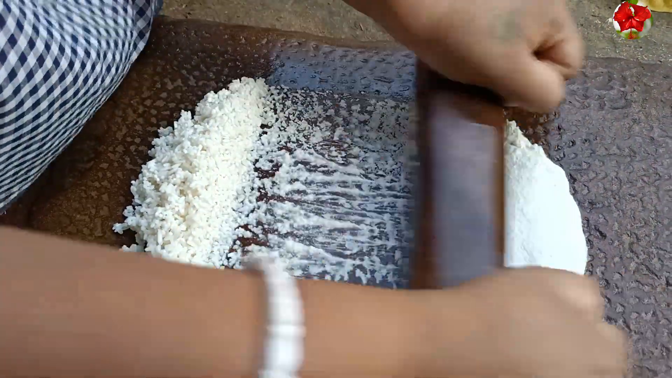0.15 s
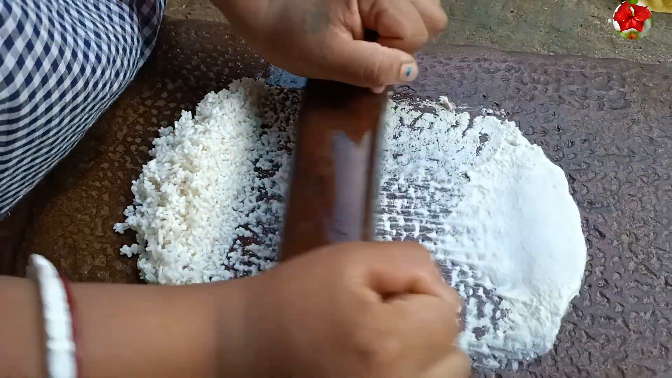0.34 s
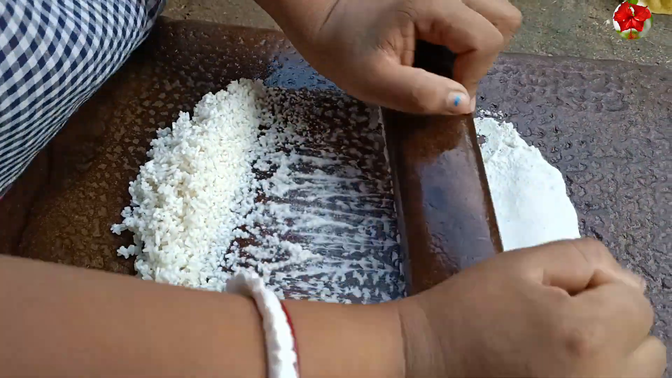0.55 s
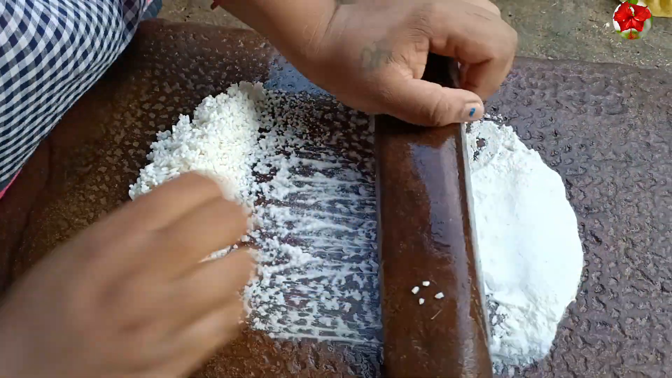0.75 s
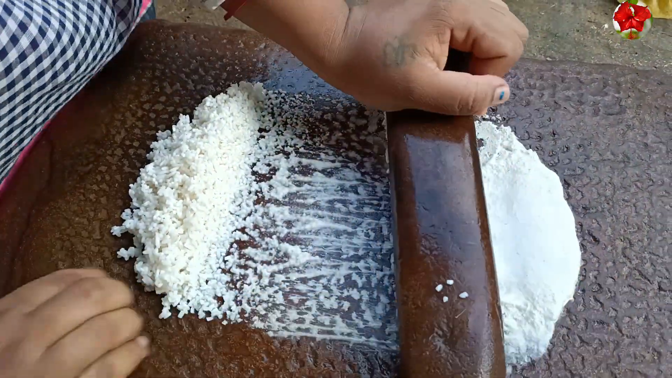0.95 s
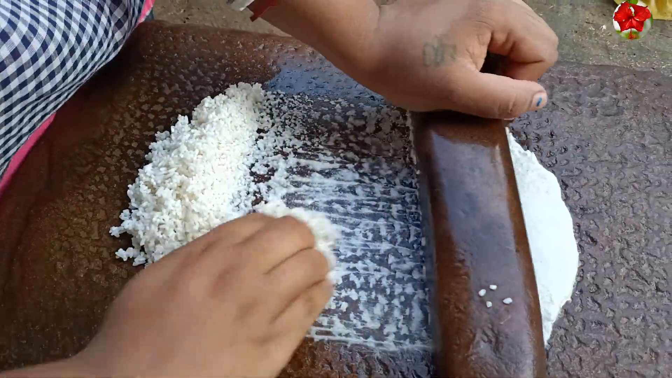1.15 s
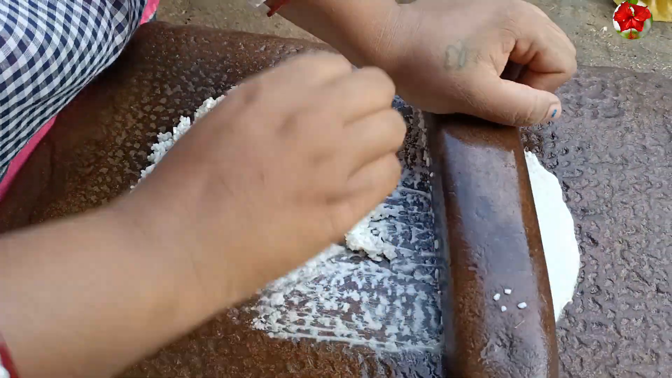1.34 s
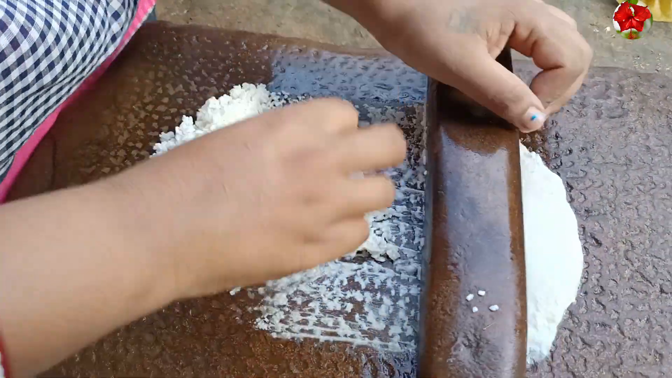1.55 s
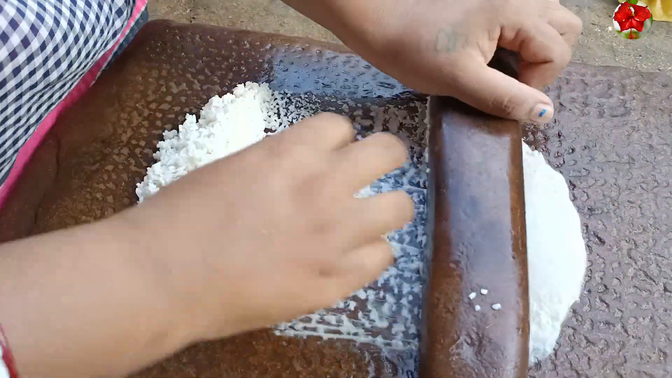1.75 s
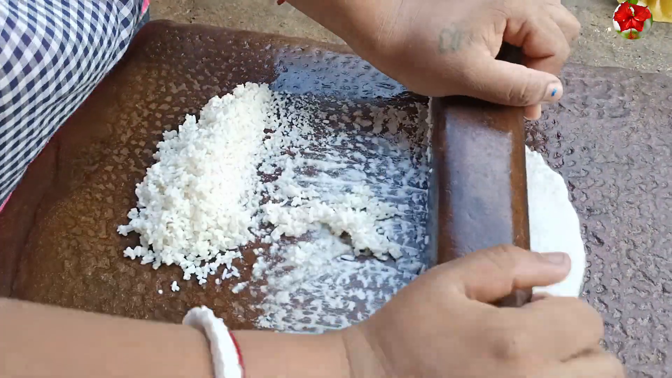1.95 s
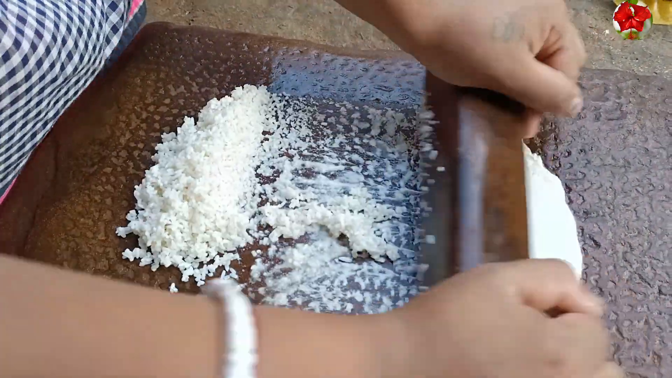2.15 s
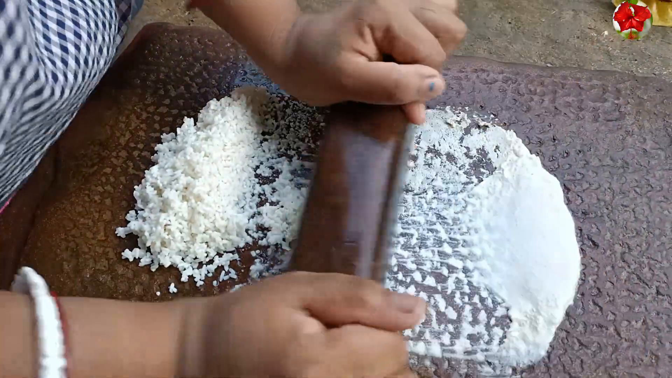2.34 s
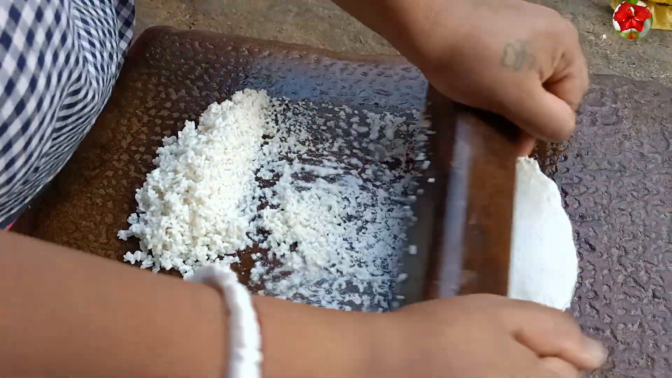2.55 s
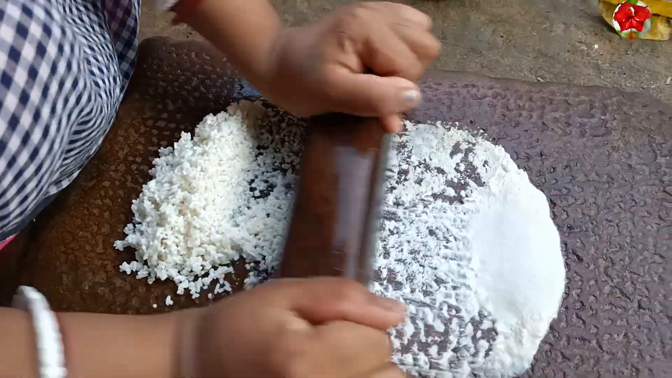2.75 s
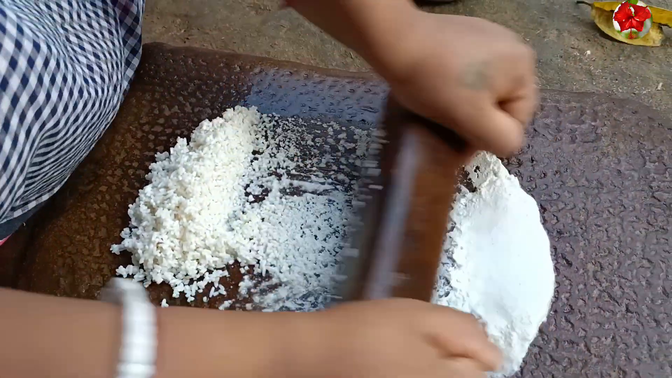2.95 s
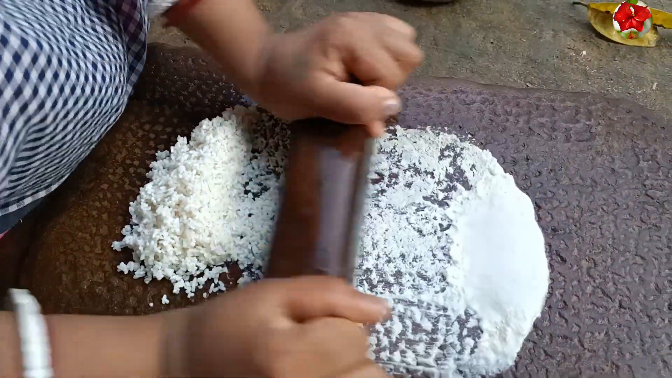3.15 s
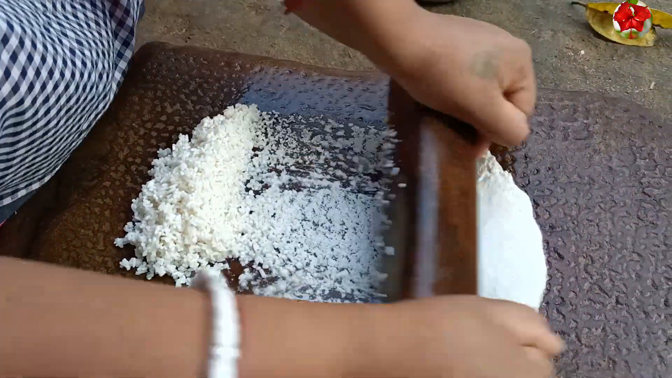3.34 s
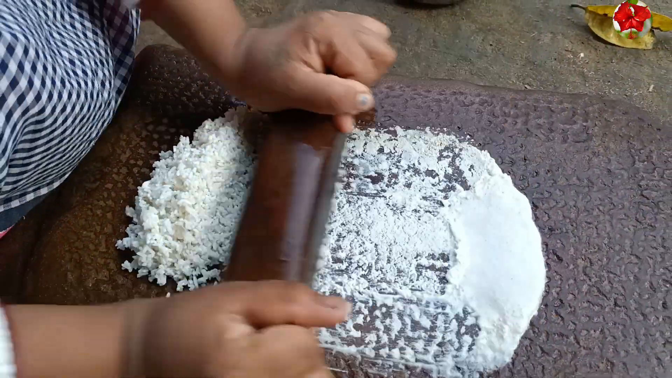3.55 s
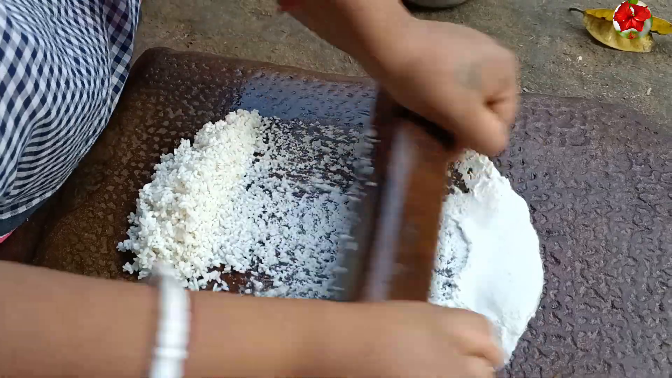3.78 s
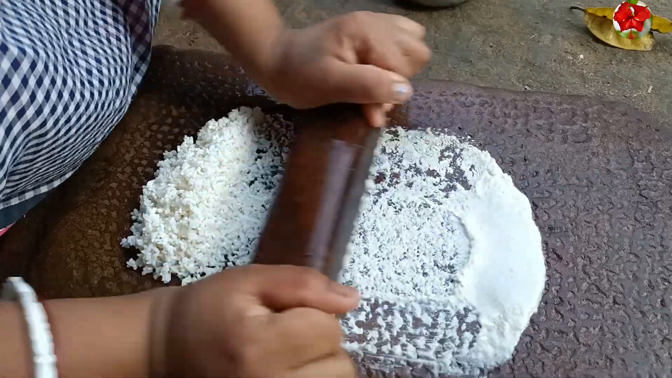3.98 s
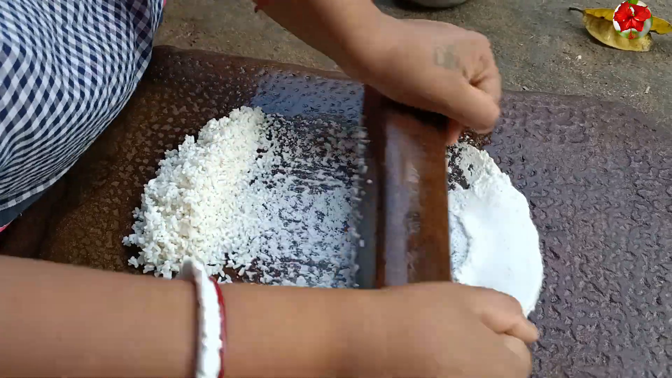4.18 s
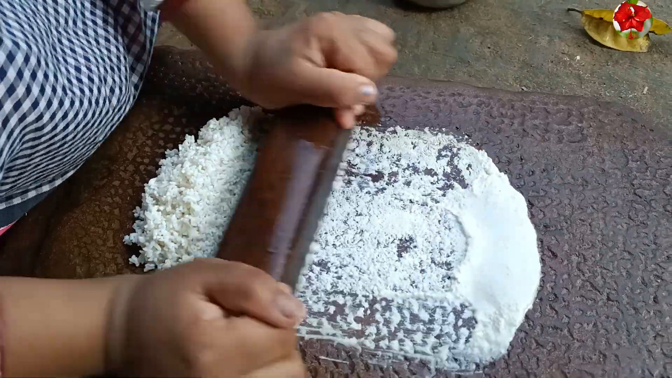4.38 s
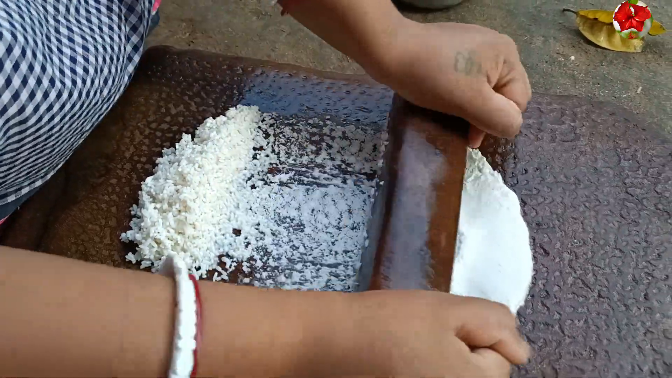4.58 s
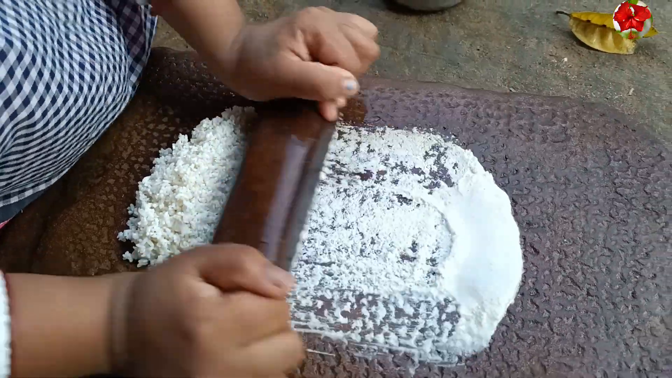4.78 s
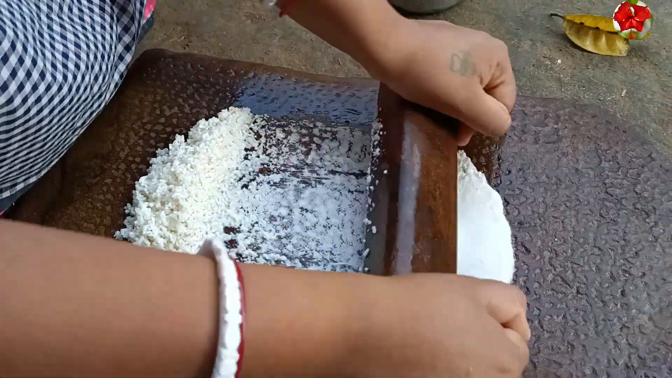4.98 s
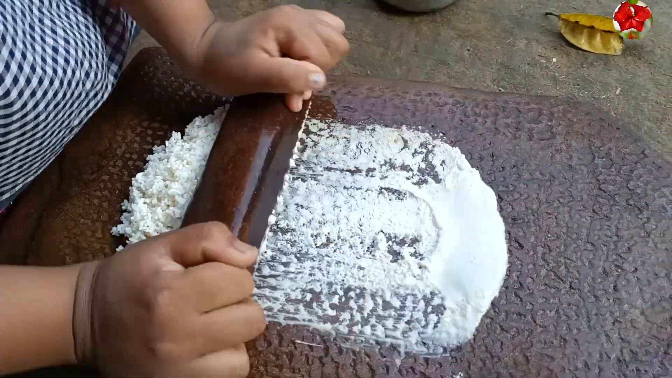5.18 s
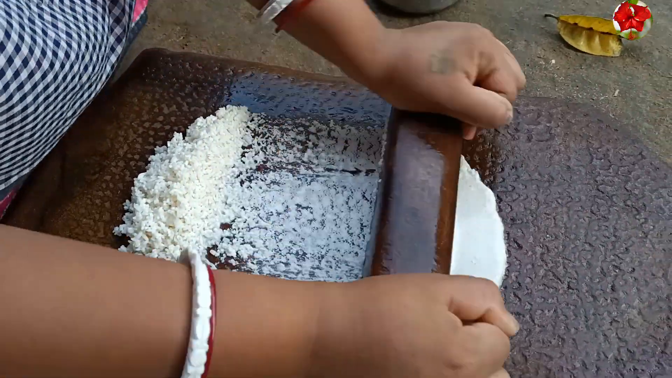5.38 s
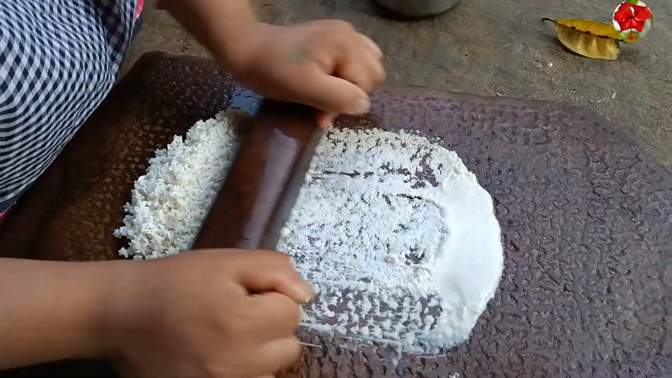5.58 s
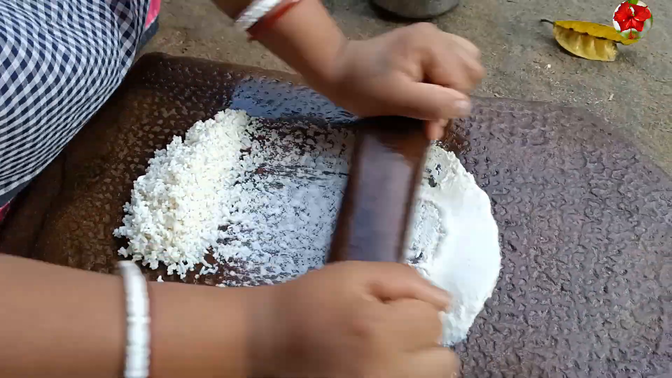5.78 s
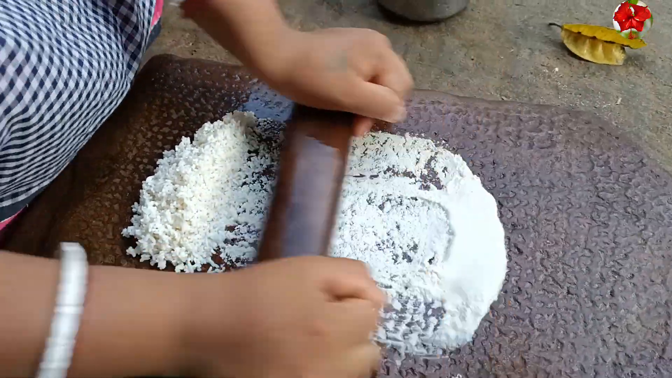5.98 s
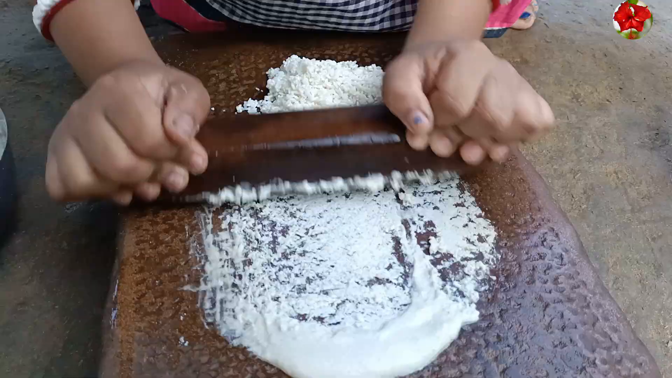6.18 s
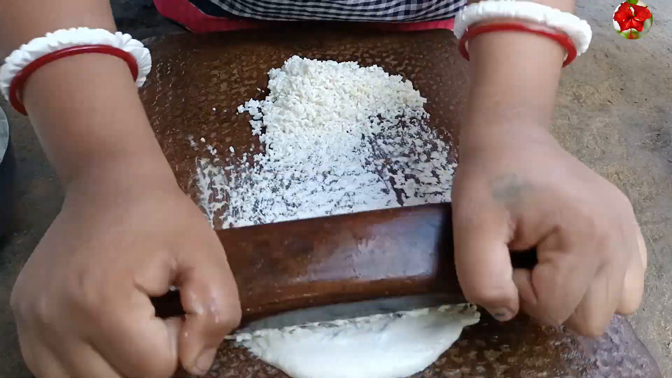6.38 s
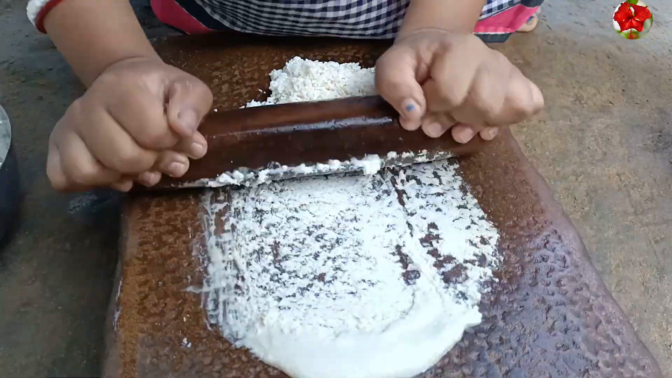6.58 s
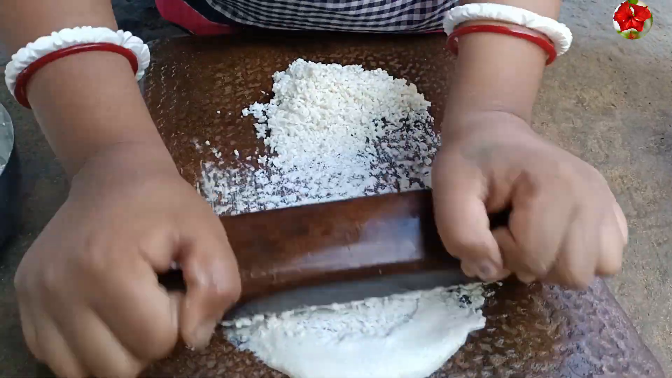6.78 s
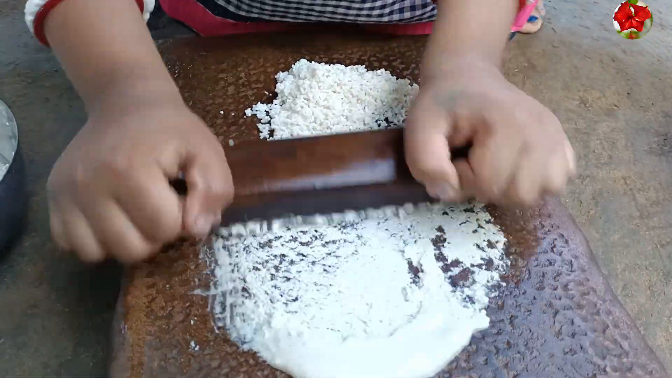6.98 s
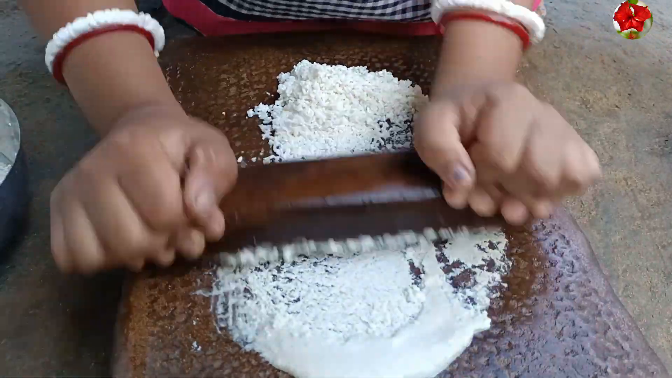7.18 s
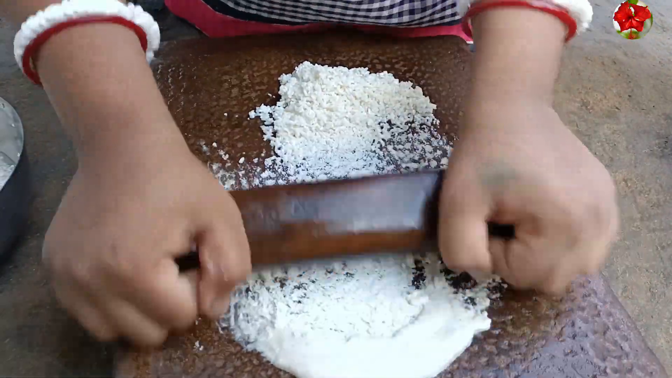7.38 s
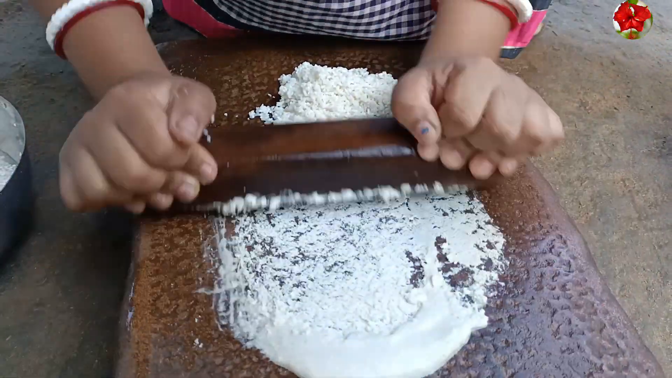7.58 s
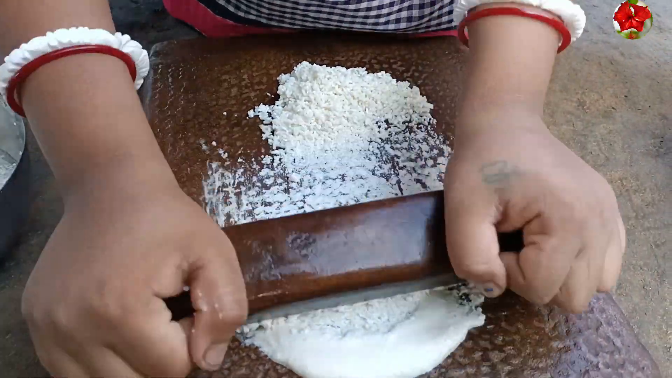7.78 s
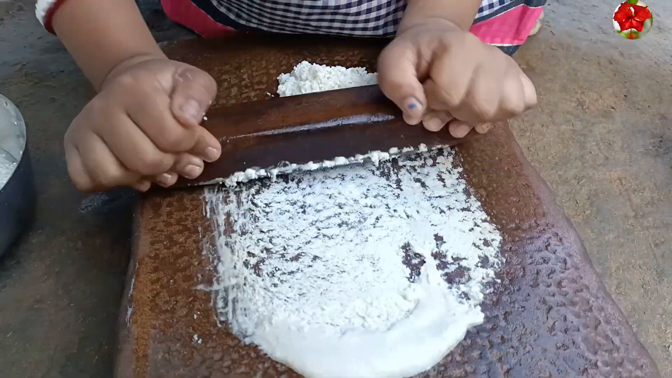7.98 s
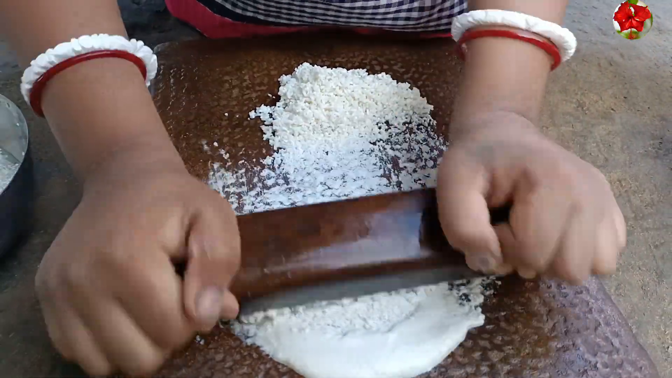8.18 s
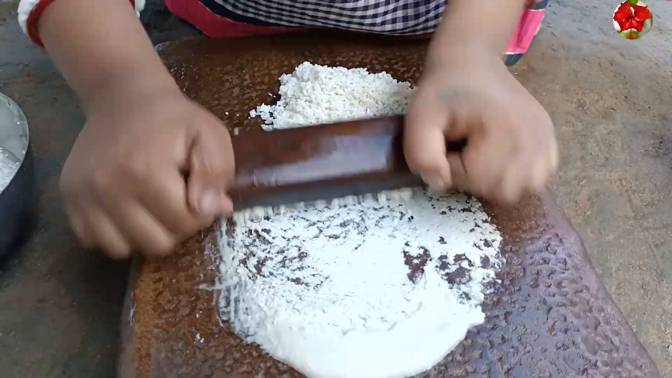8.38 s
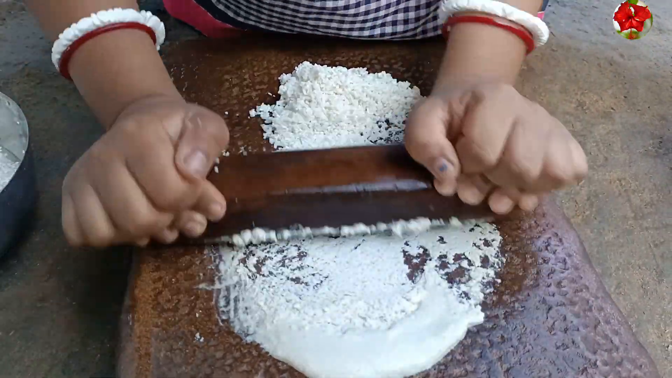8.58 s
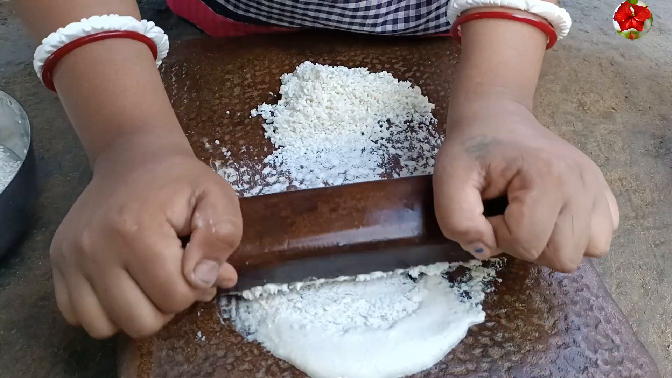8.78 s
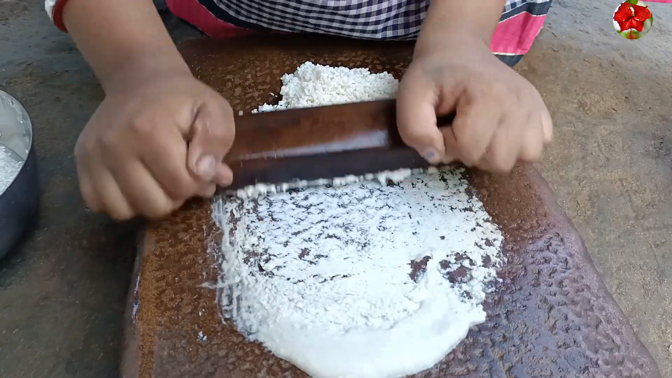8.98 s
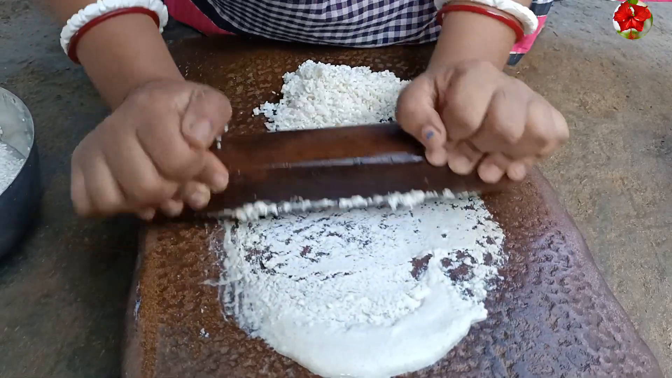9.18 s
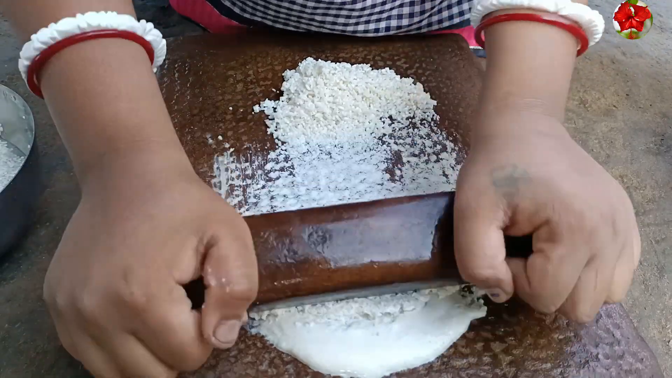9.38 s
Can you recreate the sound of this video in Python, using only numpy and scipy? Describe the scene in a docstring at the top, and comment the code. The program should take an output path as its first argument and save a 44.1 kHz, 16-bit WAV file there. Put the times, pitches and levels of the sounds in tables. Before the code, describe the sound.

A heavy stone roller rasps rhythmically back and forth over rice on a pitted slab, gritty and hissing, in a quiet yard with faint birds.

```python
"""One hears gritty strokes to and fro: a stone roller grinds soaked rice on a pitted slab in a quiet yard.
Friction drives the stones' resonances and a broadband hiss; snaps are filtered noise bursts, bumps
paired sines, knocks decaying modes. Early on, a hand scoops loose rice in a pause; far birds chirp.
The microphone is first beside the slab, then in front, where the stones ring with other modes."""
import sys
import numpy as np
from scipy import signal
from scipy.fft import rfft, irfft, next_fast_len
from scipy.io import wavfile

SR = 44100
rng = np.random.default_rng(int(sys.argv[2]) if len(sys.argv) > 2 else 0)


def waveform_to_disk(signal):
    """Save audio, clipped to [-1, 1], as 16-bit WAV at the path in sys.argv[1]."""
    frames = np.transpose(np.atleast_2d(signal))
    scaled = np.clip(frames, -1, 1) * 32767
    samples = np.round(scaled).astype(np.int16)
    wavfile.write(sys.argv[1], SR, samples)


N = 415863
T = np.arange(N) / SR  # time in s
MOVE_S = 6.06  # the microphone moves to the front

# Resonances of roller and slab, heard from the side and from the front:
# pitch_hz, width_hz, level_db (relative), left_minus_right_db
SIDE_MODES = [(460, 147, -9.5, -2.5), (549, 68.4, -3.5, -7.5), (902, 70, -10, 13), (1149, 155, -11.5, 10),
              (1416, 450, -24, 18.5), (2168, 340, -15, 12), (2452, 154, -12.5, -5), (2610, 240, -5.5, 4),
              (2760, 540, -18, -9)]
FRONT_MODES = [(496, 160, -15.5, -5), (717, 34, -22.5, -2), (900, 78, -1.5, 0), (1096, 167, -6.5, 1),
               (1930, 120, -17.5, 14.5), (2252, 113, -10.5, 16), (2610, 450, -12, -9)]
# Spectrum of the crushed rice: pitch_hz, density_db (relative, per Hz)
HISS_SPECTRUM = [(400, -16.5), (1700, -7.5), (2900, -2.5), (3800, -5), (6000, 2.5), (8700, 3),
                 (11000, -1.5), (14000, 1), (16000, -9)]
# Heavy strokes of the roller over the rice, mostly pushes, a few hard pulls through fresh rice: start_s,
# length_s, stone_db, hiss_db (gains at mid-stroke, before the pressure envelope)
HEAVY_STROKES = [(-0.013, 0.27, -48.5, -45), (0.245, 0.18, -46, -46), (0.435, 0.23, -52.5, -53),
                 (2.215, 0.28, -51, -54.5), (2.435, 0.2, -41, -41), (2.815, 0.21, -41.5, -40),
                 (3.18, 0.26, -45.5, -43.5), (3.595, 0.25, -43.5, -41), (4.015, 0.26, -47, -43.5),
                 (4.448, 0.23, -45.5, -43.5), (4.862, 0.25, -49, -48), (5.305, 0.24, -46, -45.5),
                 (5.722, 0.27, -50.5, -47.5), (6.229, 0.22, -41.5, -36.5), (6.654, 0.22, -42.5, -39.5),
                 (7.153, 0.22, -43, -40), (7.605, 0.24, -43.5, -40.5), (8.078, 0.24, -45.5, -43),
                 (8.552, 0.26, -46.5, -47), (9.13, 0.35, -51, -48.5)]


def amp(db):
    """Level law: decibels to an amplitude ratio."""
    return 10 ** (np.asarray(db) / 20)


def evened(x):
    """Energy normalisation: scales a signal to rms 1."""
    return x / np.sqrt(np.mean(np.abs(x) ** 2) + 1e-20)


def add(mix, start_s, sound):
    """Superposition: adds a sound into the mix at its start time."""
    part = mix[..., round(start_s * SR):][..., :sound.shape[-1]]
    part += sound[..., :part.shape[-1]]


def pan(balance_db):
    """Interaural level difference: left and right gains that differ by balance_db."""
    return amp([[balance_db / 2], [-balance_db / 2]])


def coloured(x, points):
    """Spectral shaping: filters x along (Hz, dB) points, log-spaced in frequency, to rms 1."""
    pitch_hz, level_db = np.transpose(points)
    size = next_fast_len(N)
    bins_hz = np.fft.rfftfreq(size, 1 / SR)
    gain = amp(np.interp(np.log(bins_hz + 1), np.log(pitch_hz), level_db))
    return evened(irfft(rfft(x, size) * gain, size)[..., :N])


def resonate(x, hz, width_hz):
    """Resonance: a double complex pole after a low-pass; the complex output carries the phase."""
    pole = np.exp((2j * np.pi * hz - np.pi * width_hz) / SR)
    softened = signal.lfilter([1], [1, -np.exp(-2 * np.pi * hz / SR)], x)
    return signal.lfilter([1, 0, -1], np.poly([pole, pole]), softened)


def wander(rate_hz):
    """Random modulation: straight lines between rate_hz random values a second, at rms 1."""
    values = rng.standard_normal(N // 100)
    return evened(np.interp(T * rate_hz, np.arange(N // 100), values))


def grit(per_s, spread_db, smooth):
    """Brittle fracture: puffs of noise of uneven size over a steady rub of power ratio smooth."""
    happens = rng.random(N) < per_s / SR
    sizes = amp(spread_db * np.minimum(rng.exponential(1, N), 4.5)) * happens
    power = signal.lfilter([1], [1, -np.exp(-1 / (0.00027 * SR))], sizes ** 2)  # power decay in s
    envelope = np.sqrt(power / power.mean() + abs(smooth))
    return envelope * rng.standard_normal((2, N)) / np.sqrt(1 + abs(smooth))


def nearby(x):
    """Early reflections: the ground and the body throw the sound back a few milliseconds later."""
    # Hard surfaces close by: left_delay_s, right_delay_s, level_db
    reflections = [(.0029, 0.0031, -19.5), (.0068, .0061, -16)]
    out = x.copy()
    for left_s, right_s, db in reflections:
        add(out[0], left_s, amp(db) * x[0])
        add(out[1], right_s, amp(db) * x[1])
    return out


def yard():
    """Diffuse ambient noise: a low murmur of open air, most alike in both ears in the bass."""
    # Spectrum of the open air: pitch_hz, density_db (relative, per Hz)
    air_spectrum = [(20, -21), (45, -1.5), (125, -0.5), (200, -9), (310, -18), (450, -16), (1200, -30.5),
                    (2200, -23), (5000, -30.5), (15000, -36)]
    shared = rng.standard_normal(N)
    highpass = signal.butter(1, 1400, "high", fs=SR)
    apart = signal.lfilter(*highpass, rng.standard_normal(N)) + 0.15 * rng.standard_normal(N)
    return amp(-59.5) * coloured(np.array([shared + apart, shared - apart]), air_spectrum)


def birds(waver=0.0188, hoarse=0.6, echo_s=0.13, echo_db=-1, flock_db=-70, syllable_s=0.0315,
          bend=0.133, rough_hz=3000, count=56):
    """Frequency modulation: hoarse gliding calls and a twitter flurry, echoed by the yard's walls."""
    # Far calls: start_s, length_s, first_hz, last_hz, level_db (before hoarseness and echo)
    calls = [(1.42, 0.17, 3560, 3640, -61), (1.431, 0.24, 1860, 1685, -63), (1.629, .11, 3200, 3540, -59.5),
             (1.776, 0.05, 3100, 2040, -59.5), (1.776, 0.19, 3620, 3150, -66),
             (2.018, 0.057, 2600, 1800, -53.5), (2.158, 0.087, 3300, 3300, -61),
             (3.403, 0.45, 1777, 1740, -49.5), (8.461, 0.2, 4880, 3010, -54)]
    song, wobble = np.zeros(N), wander(500)
    places = rng.random(count)
    glides = rng.uniform(-0.89, 1, count)
    pitches = rng.choice([2150, 3500], count) * rng.normal(1, 0.088, count)
    flock = [(1.25 + 0.74 * place, syllable_s, hz * (1 + bend * glide), hz * (1 - bend * glide), flock_db)
             for place, glide, hz in zip(places, glides, pitches)]
    for start_s, length_s, first_hz, last_hz, db in calls + flock:
        size = round(length_s * SR)
        roughness = waver * (first_hz / rough_hz) ** 2  # high calls are rougher
        local_wobble = wobble[round(start_s * SR):][:size]
        hz = np.linspace(first_hz, last_hz, size) * (1 + roughness * local_wobble)
        tone = np.sin(2 * np.pi * np.cumsum(hz) / SR)
        add(song, start_s, amp(db) * np.hanning(size) * tone)
    song = song * evened(1 + hoarse * wander(220))
    tail = rng.standard_normal((2, SR // 2)) * np.exp(-T[:SR // 2] / echo_s)
    tail = tail / np.linalg.norm(tail[0])
    return song + amp(echo_db) * signal.fftconvolve(song[None], tail, axes=1)[:, :N]


def scoop(level_db=6):
    """Granular friction: loose grains slide over each other between the fingers."""
    # Fingers in the heap of rice: time_s, gain_db (before level_db)
    strength = [(1.07, -76.5), (1.151, -44.5), (1.22, -51.5), (1.29, -67.5)]
    # Spectrum of the loose grains: pitch_hz, density_db (relative, per Hz)
    rustle_spectrum = [(2500, -26), (3450, 0), (3900, -16), (4500, 3), (5900, 1.5), (8000, -2),
                       (15000, -16.5)]
    time_s, gain_db = np.transpose(strength)
    during = (T > time_s[0]) * (T < time_s[-1])
    level = amp(level_db + np.interp(T, time_s, gain_db)) * during
    grains = grit(per_s=2300, spread_db=4.0, smooth=0.46)
    return level * pan(2.5) * coloured(grains, rustle_spectrum)


def rubs(apart=1.0, apart_hz=700):
    """Sliding friction: swells of resonant noise, less alike in both ears as the pitch rises."""
    # Rubs of roller, hands and cloth: peak_s, rise_s, fall_s, level_db (before the swell), pitch_hz, width_hz
    swells = [(.066, .022, 0.023, -38, 1256, 330), (0.478, 0.012, 0.071, -41.5, 1260, 330),
              (0.48, 0.017, 0.071, -38.5, 2810, 1830), (.94, 0.091, 0.08, -68, 1920, 1000),
              (3.336, 0.1, 0.11, -44.5, 383, 374), (3.354, 0.027, 0.073, -45, 155, 202),
              (3.558, 0.18, 0.09, -53, 1035, 200.5), (3.592, 0.13, 0.16, -47, 2140, 670),
              (3.709, 0.024, 0.096, -44, 167, 285), (7.075, 0.028, 0.028, -46.5, 960, 200),
              (9.19, 0.022, 0.035, -43, 960, 220)]
    out = np.zeros((2, N))
    for peak_s, rise_s, fall_s, db, hz, width_hz in swells:
        t = np.arange(-min(peak_s, .5), .5, 1 / SR)
        shared = rng.standard_normal(len(t))
        noise = shared + apart * hz / (hz + apart_hz) * rng.standard_normal((2, len(t)))
        swell = np.exp(-(t / np.where(t < 0, rise_s, fall_s)) ** 2)
        add(out, peak_s + t[0], amp(db) * swell * evened(resonate(noise, hz, width_hz).real))
    return out


def snaps(crack_s=0.0012, crumble_s=0.028, crumble_db=-21, breadth=1.0, balance_db=5.0):
    """Brittle fracture: a grain cracks as a millisecond burst and its crumbs follow more slowly."""
    # Grains that snap, most under the roller, a few in the pause: start_s, level_db (before a 6 dB lift and
    # panning), pitch_hz
    grains = [(0.257, -30, 11000), (0.2731, -23, 5200), (0.3417, -19.5, 9650), (0.4189, -38, 8000),
              (0.919, -42.5, 8400), (2.141, -38, 5770), (2.2705, -37.5, 6460), (2.361, -25, 8700),
              (2.421, -37, 8950), (3.0488, -23, 3670), (3.0503, -19.5, 5300), (4.817, -32, 8900),
              (4.873, -28.5, 9700), (5.328, -35, 7000), (6.249, -30.5, 7100), (7.506, -37, 11030),
              (8.514, -32.5, 7550)]
    out, t = np.zeros((2, N)), np.arange(SR // 40) / SR
    decay = np.exp(-t / crack_s) + amp(crumble_db) * np.exp(-t / crumble_s)
    for start_s, db, hz in grains:
        burst = rng.standard_normal((2, len(t))) * decay
        crack = resonate(burst, hz, breadth * hz).real
        add(out, start_s, amp(db + 6) * pan(balance_db) * crack / abs(crack).max())
    return out


def bumps(upper_ratio=2.2, upper_db=-13, knock_db=-17.5):
    """Forced vibration: the roller judders over pits, with an upper partial and a dull knock."""
    # Bumps over pits: start_s, length_s, level_db (of the lower partial, before panning), pitch_hz
    pit_hits = [(0.282, 0.02, -35.5, 576), (0.338, 0.038, -41, 562), (0.413, 0.053, -52.5, 550),
                (2.279, 0.041, -30.5, 559), (7.655, 0.0063, -18, 990)]
    out = np.zeros((2, N))
    dull = signal.butter(5, [450, 2700], "band", fs=SR)
    for start_s, length_s, db, hz in pit_hits:
        t = np.arange(round(length_s * SR)) / SR
        upper = amp(upper_db) * np.sin(2 * np.pi * hz * upper_ratio * t)
        judder = np.sin(2 * np.pi * hz * t) + upper
        knock = evened(signal.lfilter(*dull, rng.standard_normal(len(t))))
        envelope = np.sin(np.pi * t / length_s)
        add(out, start_s, amp(db) * pan(3.9) * (judder + amp(knock_db) * knock) * envelope)
    return out


def knocks(low_hz=750, high_hz=2000, damping=0.7, balance_db=2):
    """Impact excitation: dropping off a grain, the roller briefly rings the stones' middle modes."""
    # Knocks on the slab: start_s, level_db (of the peak, before panning)
    drops = [(3.0655, -23.5), (3.0708, -23), (3.0762, -19), (3.0795, -30), (8.0545, -16.5), (8.1112, -24),
             (8.1172, -28), (8.126, -28), (8.1318, -23.5)]
    out, t = np.zeros((2, N)), np.arange(SR // 20) / SR
    contact = signal.butter(3, [low_hz, high_hz], "band", fs=SR)
    for start_s, peak_db in drops:
        ring = np.zeros(len(t))
        for hz, width_hz, db, _ in (SIDE_MODES if start_s < MOVE_S else FRONT_MODES):
            decay = np.exp(-np.pi * damping * width_hz * t)
            ring += amp(db) * np.sqrt(width_hz) * decay * np.cos(2 * np.pi * hz * t)
        ring = signal.lfilter(*contact, ring)
        add(out, start_s, amp(peak_db) * pan(balance_db) * ring / abs(ring).max())
    return out


def strokes(rows, shapes, bite_stone_db, bite_hiss_db, stone_power=2, hiss_power=1.65,
            bite_before_turn_s=0.066, bite_s=0.017, cushion_db=-3.5, flatten_s=0.052, break_through_s=0.0061):
    """Contact mechanics: pressure rises, holds and falls; rice cushions stone until it is flattened."""
    levels = np.zeros((2, N))
    for start_s, length_s, stone_db, hiss_db in rows:
        in_front = int(start_s > MOVE_S - length_s / 2)
        attack_s, release_s, stone_growth, hiss_growth = shapes[in_front]
        t = np.arange(max(-start_s, 0), length_s, 1 / SR)
        from_middle = t - length_s / 2
        pressure = abs(np.minimum(t / attack_s, 1) * np.minimum((length_s - t) / release_s, 1))
        cushion = cushion_db * np.clip((flatten_s - t) / break_through_s, 0, 1)
        bite = np.exp(-((length_s - t - bite_before_turn_s) / bite_s) ** 2)
        stone = amp(stone_db + stone_growth * from_middle + cushion + bite_stone_db * bite)
        hiss = amp(hiss_db + hiss_growth * from_middle + bite_hiss_db * bite)
        both = np.array([stone * pressure ** stone_power, hiss * pressure ** hiss_power])
        add(levels, max(start_s, 0), both)
    return levels


def stroke_levels():
    """Work against friction: heavy strokes and light returns, which bite into whole grains near the end."""
    # Strokes that draw the roller lightly back to the heap:
    # start_s, length_s, stone_db, hiss_db (gains at mid-stroke, before envelope and bite)
    returns = [(2.625, 0.21, -51, -47.5), (3.011, 0.19, -49, -46), (3.412, 0.21, -53.5, -46),
               (3.794, 0.25, -58.5, -51), (4.235, 0.24, -60, -54), (4.676, 0.21, -55.5, -50.5),
               (5.097, 0.23, -60, -55.5), (5.504, 0.24, -60.5, -52.5), (5.945, 0.14, -65, -51),
               (6.044, 0.2, -46.5, -42), (6.445, 0.24, -52, -45), (6.919, 0.26, -54, -47.5),
               (7.377, 0.24, -54, -48), (7.856, 0.26, -53.5, -46.5), (8.334, 0.24, -52.5, -47),
               (8.84, 0.3, -61, -51.5)]
    # A push starts heavy and fades as the arms stretch; a return gathers weight.
    # One row from the side, one from the front:
    # attack_s, release_s, stone_growth_db_per_s, hiss_growth_db_per_s
    push_shape = [(0.041, 0.1, -115, -81), (0.031, 0.12, -75.5, 7)]
    return_shape = [(0.059, 0.075, 125, 47), (0.086, 0.093, 60, -36)]
    pushed = strokes(HEAVY_STROKES, push_shape, bite_stone_db=0, bite_hiss_db=0)
    return pushed + strokes(returns, return_shape, bite_stone_db=4, bite_hiss_db=7)


def stones(drive, modes, glide, sway=.012, flicker_db=2.18, contact_db=0.77, apart_hz=2600, pivot_hz=950):
    """Modal resonance: modes waver as the contact line shifts and spread as the roller travels out."""
    out = np.zeros((2, N))
    turns = [s for start_s, length_s, _, _ in HEAVY_STROKES for s in (start_s, start_s + length_s)]
    position = np.interp(T, turns, [-1, 1] * len(HEAVY_STROKES))
    for hz, width_hz, db, balance_db in modes:
        difference = hz / (hz + apart_hz) * np.array([drive[1], -drive[1]])
        ports = drive[0] + difference  # high modes differ between the ears
        bend = sway * wander(12) + glide * np.log2(hz / pivot_hz) * position
        shift = np.exp(2j * np.pi * np.cumsum(hz * bend) / SR)
        ring = evened((resonate(ports, hz, width_hz) * shift).real)
        out += amp(db + flicker_db * wander(30) + contact_db * wander(5)) * pan(balance_db) * ring
    return out


def rasp(hz=4500, width_hz=3600):
    """Granular friction: coarse pieces of rice grate between the stones as resonant noise."""
    # Rasp of coarse rice against the rumble of the stones: time_s, level_db (relative)
    coarseness = [(0.5, -12), (2.5, -2.5), (3.8, 2.5), (4.7, -18.5), (9.4, -19)]
    grains = evened(resonate(grit(per_s=420, spread_db=3.5, smooth=0.7), hz, width_hz).real)
    return amp(np.interp(T, *np.transpose(coarseness))) * pan(4.8) * grains


def crunch(level_db=-9):
    """Brittle fracture: whole grains give way as a sparse, coarse crackle over the fine hiss."""
    return amp(level_db) * coloured(grit(per_s=170, spread_db=3.6, smooth=0), HISS_SPECTRUM)


def off_the_hands(x, delay_s=0.000901, travel=0.246, strength=0.83):
    """Comb filtering: a reflection off the moving hands sweeps soft notches through the hiss."""
    return np.array([ear + strength * np.interp(T - delay_s * np.exp(travel * wander(5)), T, ear)
                     for ear in x])


def grinding(pits_db=0.6, lumps_db=0.96, surge_db=0.7, hiss_db=-0.5):
    """Friction-driven vibration: strokes shake the stones unevenly over pits and crush rice to a hiss."""
    stone_level, hiss_level = stroke_levels()
    front = np.clip((T - MOVE_S) / 0.02, 0, 1)
    pits = wander(140)
    drive = grit(per_s=530, spread_db=0.0, smooth=1.0)
    side_ring = stones(drive, SIDE_MODES, glide=0.0101)
    front_ring = stones(drive, FRONT_MODES, glide=.04)
    ring = (1 - front) * side_ring + front * front_ring + rasp()
    fine = grit(per_s=1400, spread_db=3.0, smooth=2.5)
    hiss = off_the_hands(coloured(fine, HISS_SPECTRUM) + crunch()) * pan(1.0)
    hiss_gain = hiss_level * amp(hiss_db + lumps_db * pits + surge_db * wander(45))
    return nearby(ring * stone_level * amp(pits_db * pits)) + hiss * hiss_gain


def scene():
    """Superposition of all sources, from the background to the grinding."""
    return yard() + birds() + scoop() + rubs() + snaps() + nearby(bumps() + knocks()) + grinding()


def notched(x, notches):
    """Band rejection: cuts smooth dips into the spectrum of one channel."""
    size = next_fast_len(N)
    hz = np.fft.rfftfreq(size, 1 / SR)
    dips_db = sum(depth_db * np.exp(-((hz - centre_hz) / width_hz) ** 2)
                  for centre_hz, width_hz, depth_db in notches)
    return irfft(rfft(x, size) * amp(-dips_db), size)[:N]


def record(dry):
    """Linear filtering: the colour of the two microphone ports, then the recorder's band limit."""
    # Dips in the response of each microphone port: pitch_hz, width_hz, depth_db
    left_notches = [(7180, 870, 8.5)]
    right_notches = [(9600, 350, 10.7), (13400, 740, 4.5)]
    ports = np.array([notched(dry[0], left_notches), notched(dry[1], right_notches)])
    lowpass = signal.firwin(255, 15800, window=("kaiser", 8), fs=SR)  # edge in Hz
    return signal.oaconvolve(ports, lowpass[None], "same")


dry = scene()
out = record(dry)
waveform_to_disk(out)
```